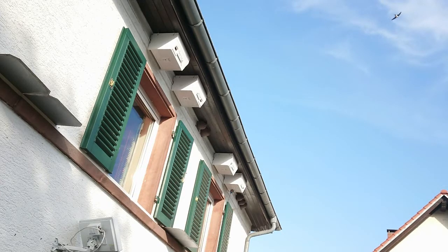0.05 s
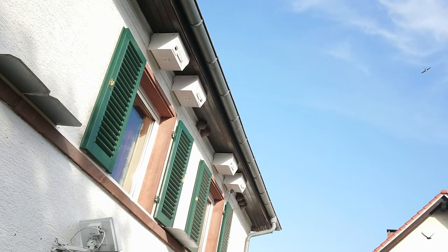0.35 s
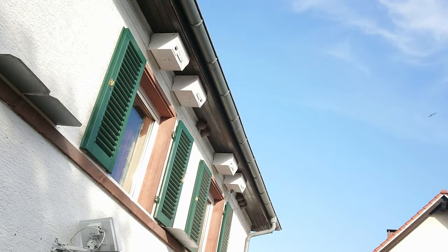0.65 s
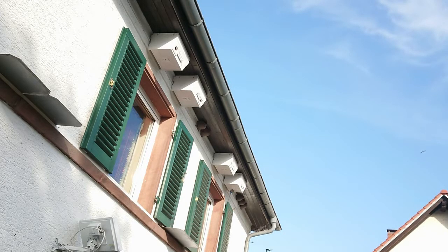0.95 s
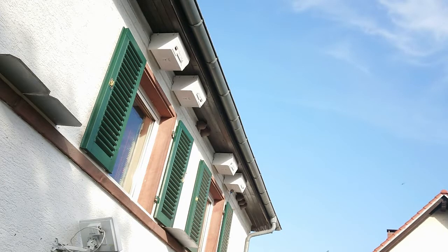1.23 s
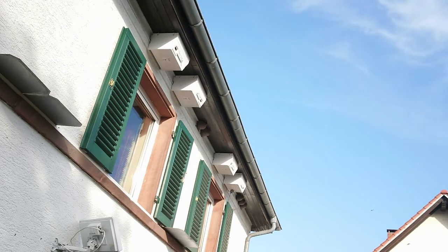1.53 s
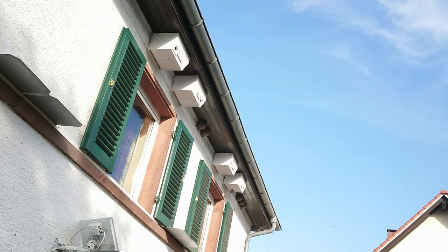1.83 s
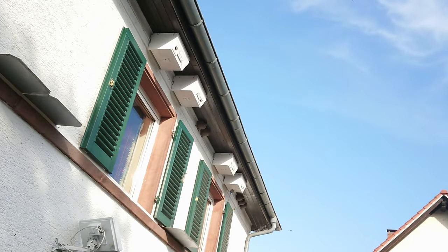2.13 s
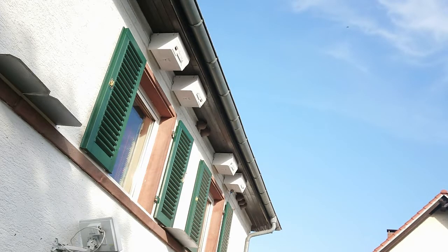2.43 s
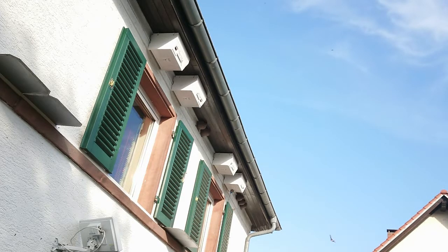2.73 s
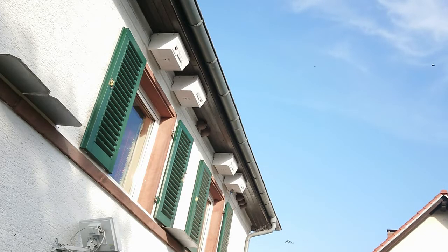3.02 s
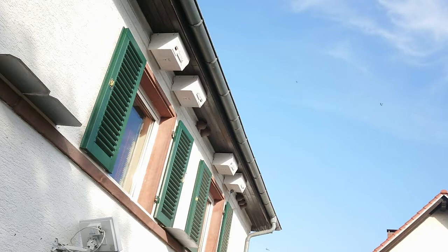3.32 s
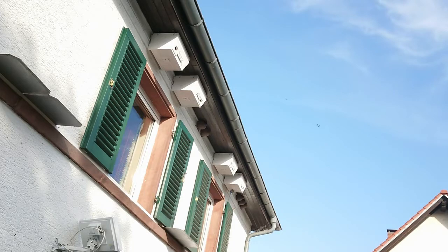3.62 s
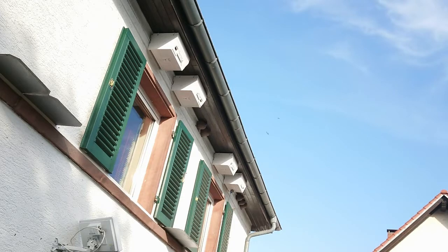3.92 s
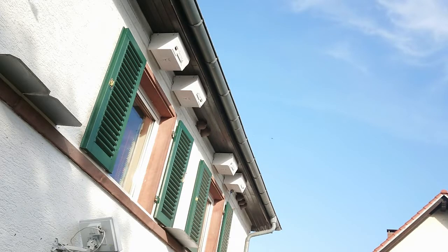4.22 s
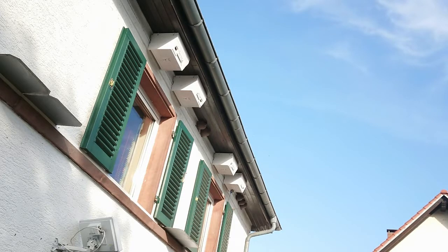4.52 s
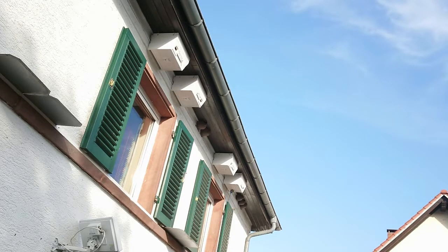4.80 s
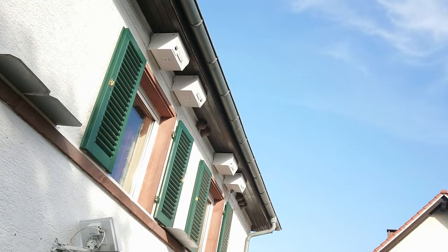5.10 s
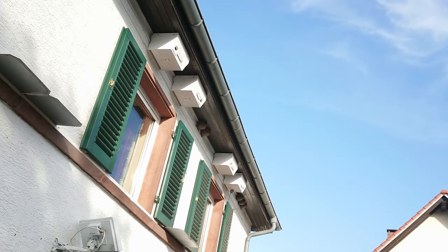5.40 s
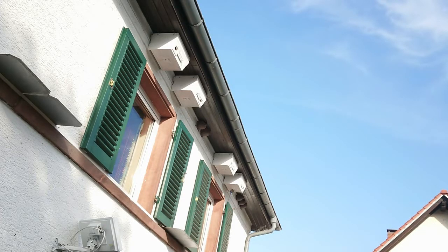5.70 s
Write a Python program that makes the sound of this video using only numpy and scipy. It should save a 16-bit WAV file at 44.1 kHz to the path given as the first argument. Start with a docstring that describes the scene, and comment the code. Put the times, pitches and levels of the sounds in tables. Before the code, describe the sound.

Small birds call around a village house over a steady soft hiss and low rumble. House martins give short, high cheeps about two or three times a second throughout, mixed with thin rasps and tiny rattles. A swift screams at 0.2 seconds and breaks into quick pips. A louder, shrill, buzzy scream comes at 1 second, trailing into pips by 1.5. Around 2 seconds there is a loud squabble of quick whistles and chirps, then a distant village wash swells softly until 3. More swift screams at 3 and 3.7 seconds each end in rapid pips. After 4 seconds the calls thin to martin cheeps and twitters, with one weak scream, until the end near 5.7. A high flock, a far songbird and, mainly from 3.5 seconds, a cooing dove are very faint. The near calls sit mostly to the right and echo briefly off the walls.

```python
"""A house martin cheeps, then swifts scream as both circle over a village house. Screams are whistles chopped
into a fast buzz that break up into pips; martins add slurs and rattles, and both birds add harsh level notes.
Walls echo the calls. Behind lie a high flock, a far dove and songbird, a low rumble, a soft hiss and a village
wash that swells once. Two unlike microphone ports colour left and right differently."""
import sys
import numpy as np
from scipy import signal
from scipy.fft import rfft, irfft, next_fast_len
from scipy.io import wavfile
from scipy.ndimage import uniform_filter1d, map_coordinates

SR = 44100
rng = np.random.default_rng(int(sys.argv[2]) if len(sys.argv) > 2 else 0)


def store_pcm(level_fs):
    """Save levels as 16-bit WAV."""
    pcm = np.round(np.clip(level_fs, -1, 1) * 32767).astype(np.int16)
    wavfile.write(sys.argv[1], SR, np.atleast_2d(pcm).T)


N = 253575
TOP_HZ = 15700

# Call levels are ahead of the colouring filters.
# swift screams: (time [s], length [s], start [Hz], middle [Hz], end [Hz], start level [dB], fade [dB],
# mid buzz depth [0-1], half harmonics at start [dB])
SCREAMS = [(0.238, .23, 4305, 4440, 4784, -40.5, 2.5, 0.98, -46),
           (1.013, .138, 4792, 4730, 4926, -23, 9, 0.23, -35),
           (1.15, 0.3, 5060, 5540, 5585, -37, 11, 0.83, -32),
           (3.046, .17, 4592, 4612, 4562, -29, 2.5, 0.45, -45),
           (3.714, .185, 4627, 5078, 4940, -24, 12.5, 0.35, -44.5),
           (4.709, 0.18, 4560, 4406, 4434, -47.5, 1.5, 0.37, -60)]
# swift whistles: (time [s], length [s], start [Hz], middle [Hz], end [Hz], level [dB])
WHISTLES = [(0.133, .11, 4650, 4150, 3980, -47.5), (0.943, .04, 4250, 4520, 5000, -37.5),
            (0.975, 0.057, 5200, 5360, 4890, -36), (1.868, 0.055, 4600, 4964, 4450, -30),
            (1.928, .03, 4100, 4754, 4930, -25), (1.953, 0.015, 3554, 3652, 3810, -25),
            (1.954, 0.044, 5200, 5680, 5850, -41.5), (1.968, 0.033, 4345, 5120, 4530, -28.5),
            (2.036, 0.019, 3300, 3336, 3580, -36.5), (2.064, 0.0343, 4248, 4543, 4430, -26.5),
            (2.969, 0.0846, 4220, 4510, 4310, -40.5), (3.675, 0.041, 3960, 4190, 4300, -46)]
# swift pips: (first [s], last [s], rate [1/s], pitch [Hz], final sag [Hz], level [dB], final gain [dB])
PIP_TRAINS = [(0.508, 0.591, 40, 5656, 690, -37.5, 4.5), (1.391, 1.536, 35, 5814, 990, -37, 5.5),
              (3.276, 3.347, 70, 4643, 158, -31.5, -1), (3.915, 3.992, 65.5, 4914, 370, -27.5, 2)]
# martin cheeps: (end time [s], level [dB])
CHEEPS = [(0.138, -35), (.46, -30.5), (.788, -30.5), (1.258, -37), (1.787, -47), (2.292, -31.5),
          (2.732, -32), (3.488, -35), (4.105, -32), (4.407, -37.5), (4.614, -34), (5.078, -31.5),
          (5.495, -33.5)]
# contour of a cheep: (time from end [s], pitch [Hz], level [dB])
CHEEP_SHAPE = [(-.07, 4540, -6.5), (-.055, 5000, -14.5), (-.036, 5040, -11), (-.024, 5000, -5),
               (-.012, 4600, 3), (0, 4520, -6.5)]
# martin loops, up and down: (time [s], length [s], level [dB])
LOOPS = [(0.387, 0.068, -51), (0.953, 0.053, -52), (2.443, 0.032, -53), (2.905, .023, -59), (3.35, .1, -51),
         (3.8, 0.088, -54.5), (4.299, .046, -54.5), (4.781, 0.049, -48.5), (4.94, 0.032, -53)]
# martin downward flicks: (time [s], middle pitch [Hz], level [dB])
FLICKS = [(1.818, 4500, -35.5), (1.995, 4650, -26.5), (2.019, 4400, -35), (2.921, 4600, -58),
          (3.298, 8650, -48.5), (3.644, 4500, -41), (3.765, 7670, -51), (5.398, 4770, -45.5),
          (5.653, 3970, -38.5), (5.653, 8260, -55.5)]
# harsh notes of near-level pitch, from martins and swifts; the thin ones near 11 kHz lie an octave above swift
# pips, and the one at 1.165 s rides on the swift scream: (time [s], length [s], pitch [Hz], level [dB],
# harshness [0-1])
RASPS = [(0.477, .12, 7370, -59.5, 0.55), (0.488, .15, 10900, -69, 0.23), (0.728, 0.017, 4750, -43, 0.5),
         (1.135, 0.15, 4840, -40.5, 0.54), (1.165, 0.21, 7190, -59, 0.33), (1.382, .15, 11600, -60, 0.47),
         (1.386, 0.097, 7720, -52.5, .85), (1.486, .05, 5850, -40.5, 0.24), (1.839, 0.053, 6080, -48, 0.57),
         (2.412, .29, 11300, -73, 1), (2.796, 0.058, 7000, -58, 0.9), (3.331, 0.34, 11000, -71.5, 0.7),
         (4.722, 0.057, 7200, -61.5, 0.4), (4.773, 0.022, 5030, -40.5, 0.32), (4.783, .1, 11460, -65, 0.67),
         (4.827, 0.0466, 9100, -49, 0.54), (4.868, 0.02, 7530, -45.5, .3),
         (4.876, 0.031, 5030, -38.5, 0.38), (5.103, 0.125, 10970, -65.5, 0.15)]
# martin rattles: (time [s], length [s], level [dB])
RATTLES = [(0.615, .015, -45), (1.412, .055, -39), (1.51, .04, -36.5), (1.8, .01, -36.5),
           (1.822, .037, -38), (1.894, .03, -33.5), (2.095, .005, -33.5), (2.802, .052, -50.5),
           (3.758, .032, -46.5), (4.115, .04, -46.5), (4.291, .06, -48)]
# far dove: (time [s], length [s], pitch [Hz], level [dB])
COOS = [(1.6, 0.287, 386, -70), (3.52, 0.21, 487.5, -69), (3.76, 0.19, 489.7, -68),
        (3.99, 0.11, 488.4, -69.5), (4.26, .208, 492.5, -73.5), (5, 0.203, 485.4, -71.5),
        (5.26, 0.35, 444.6, -66.5)]
# far songbird: (time [s], length [s], pitch [Hz], level [dB])
FAR_NOTES = [(2.6, 0.65, 2191, -67.5), (2.698, 0.27, 2820, -67.5), (3.39, 0.048, 2390, -69),
             (5.547, 0.184, 1645, -71.5)]
# syrinx harmonics 2 and 3: (level [dB])
OVERTONES_DB = [-29, -37]
# colour of the near calls: (frequency [Hz], gain [dB])
CALL_EQ_DB = [(1000, -27), (2400, -7.5), (3200, -3), (5000, 1.5), (6500, -9.5), (7400, 3.5), (8200, -2.5),
              (9400, -8), (11300, 4.5), (12800, -15), (14200, -3)]
# left port against right, direct sound: (frequency [Hz], gain [dB])
LEFT_DIRECT_DB = [(2400, 5.5), (3600, -1.5), (4200, 0), (4700, -22.5), (5150, -19), (5700, -3), (7500, 3.5),
                  (9500, 6), (11500, -0.5), (15000, -33)]
# left port against right, echoes: (frequency [Hz], gain [dB])
LEFT_ECHO_DB = [(500, -31), (2400, 1.5), (3600, 2), (4700, -21), (5700, -2), (7500, -1), (11500, 11)]
# wall echo decay: (frequency [Hz], T60 [s])
WALL_T60_S = [(500, 0.77), (4500, 0.72), (8000, 0.92), (14000, 0.068)]
# noise spectra: (frequency [Hz], relative density [dB])
RUMBLE_DB = [(13, -34), (22, -53), (43, 2), (69, 6), (97, 2), (178, -13.5), (257, -20.5), (300, -33),
             (390, -44), (660, -120)]
WASH_DB = [(120, -12), (220, -13), (400, -4.5), (600, -3.5), (800, -6), (1050, -5.5), (1350, -13.5),
           (2000, -7.5), (3500, -13), (6000, -120)]
HISS_DB = [(800, -70), (1400, -16.5), (2000, -21), (2600, -14), (3300, -4), (4100, -7), (4700, -1.5),
           (5600, -21), (6400, -12.5), (7400, -18), (9400, -27), (11100, -24), (12800, -32.5), (15500, -38)]
# background left-right likeness: (frequency [Hz], correlation [-1 to 1])
NOISE_CORRELATION = [(60, 0.93), (120, 0.53), (240, 0.8), (480, 0.51), (950, 0.15), (1890, -0.43),
                     (3770, 0.47), (7520, 0.11), (15000, 0.084)]
# background balance: (frequency [Hz], left minus right [dB])
NOISE_BALANCE_DB = [(60, -3), (200, -11), (600, -4), (1300, -4.5), (2400, -1), (3500, 8), (4600, -16),
                    (6000, -1), (8000, 0.5), (15000, -2)]


def swift_screams(buzz_start_hz=236.4, slowing_hz_per_s=102, deepening=0.22, strain_db=16, attack_s=0.01):
    """Screams fade as the buzz tires and deepens; strain raises the half harmonics."""
    out = np.zeros(N)
    for time_s, length_s, *bend_hz, db, fade_db, depth, half_db in SCREAMS:
        pitch_hz, _ = arch(length_s, *bend_hz)
        pitch_hz *= 1 + 0.005 * wobble(44.9, len(pitch_hz))
        progress = np.linspace(0, 1, len(pitch_hz))
        attack = np.minimum(1, length_s * progress / attack_s)
        buzz_hz = buzz_start_hz - slowing_hz_per_s * length_s * progress
        scream = syrinx(pitch_hz, db - fade_db * progress, buzz_hz, depth + deepening * (progress - 0.5),
                        half_db=half_db + strain_db * progress, rasp_db=-28 + 6 * depth,
                        unsteady=0.023, waver=0.00506, flutter_db=1.5)
        add(out, time_s, attack * scream)
    return out


def swift_whistles():
    """Clear, lightly buzzed whistles: lead-ins to screams, or a squabble."""
    out = np.zeros(N)
    for time_s, length_s, *bend_hz, db in WHISTLES:
        pitch_hz, swell = arch(length_s, *bend_hz)
        whistle = syrinx(pitch_hz, db, 211.5, 0.25,
                         rasp_db=-24.5, unsteady=0.035, waver=0.005, flutter_db=1.6)
        add(out, time_s, swell * whistle)
    return out


def swift_pips(start_duty=0.58, shortening=0.25, scatter_db=1.0):
    """A scream breaks into evenly spaced pips; late ones sink, shorten and fall more steeply."""
    out = np.zeros(N)
    for first_s, last_s, rate_hz, top_hz, sag_hz, db, gain_db in PIP_TRAINS:
        for progress in np.linspace(0, 1, round((last_s - first_s) * rate_hz) + 1):
            late = progress ** 3.2
            length_s = start_duty * (1 - shortening * late) / rate_hz
            hz = top_hz - sag_hz * late
            half_fall_hz = 50 + 150 * progress
            pitch_hz, swell = arch(length_s, hz + half_fall_hz, hz, hz - half_fall_hz)
            pip_db = db + gain_db * late + scatter_db * rng.standard_normal()
            pip = swell ** 2 * syrinx(pitch_hz, pip_db, 188, 0.29, rasp_db=-17.5)
            add(out, first_s + progress * (last_s - first_s) - length_s / 2, pip)
    return out


def syrinx(hz, db, buzz_hz, depth, half_db=-70, rasp_db=-24, swing_hz=200,
           unsteady=0.037, waver=0.0056, flutter_db=1.93):
    """A whistle; a slower vibration chops it and bends its pitch within each pulse."""
    n = len(hz)
    depth = np.clip(depth, 0, 1)
    buzz_phase = 2 * np.pi * np.cumsum(buzz_hz * (1 + unsteady * wobble(144.4, n))) / SR
    gate = (1 + depth * np.cos(buzz_phase)) / np.sqrt(1 + depth ** 2 / 2)
    roughness = 1 + 2 * depth
    pitch_hz = hz * (1 + waver * roughness * wobble(500, n)) - swing_hz * depth * np.sin(buzz_phase)
    phase = 2 * np.pi * np.cumsum(pitch_hz) / SR
    phase += amp(rasp_db) * roughness * wobble(2200, n)  # uneven cycles smear the partials
    tone = np.sin(phase)
    for k, overtone_db in enumerate(OVERTONES_DB, 2):
        tone += amp(overtone_db) * np.sin(k * phase) * (k * hz < TOP_HZ)
    tone += amp(half_db) * (np.sin(1.5 * phase) + 0.79 * np.sin(phase / 2))  # strain doubles the period
    edges = signal.windows.tukey(n, min(1, 0.0022 * SR / n))
    return np.sqrt(2) * tone * gate * edges * amp(db + flutter_db * wobble(169.7, n))


def martin_cheeps(upper_offset_hz=700, upper_db=-53):
    """Arched cheeps, each bent differently; the other side of the syrinx sings faintly above."""
    out = np.zeros(N)
    shape_hz, shape_db = curves(CHEEP_SHAPE)
    n = len(shape_hz)
    for end_s, db in CHEEPS:
        pitch_hz = shape_hz * (1 + 0.011 * wobble(30.3, n))
        upper = np.hanning(n) * syrinx(pitch_hz + upper_offset_hz, upper_db, 180, 0.22)
        lower = syrinx(pitch_hz, db + shape_db + 2 * wobble(61.6, n), 260.3, 0.24, rasp_db=-17)
        add(out, end_s + CHEEP_SHAPE[0][0], lower + upper)
    return equalise(out, [(6500, -4.5), (9000, -13), (14000, -16)])


def slur(length_s, bend_hz, db, harsh):
    """One glide; harshness deepens its buzz and smears its pitch."""
    pitch_hz, swell = arch(length_s, *bend_hz)
    return swell * syrinx(pitch_hz, db, 180, harsh, rasp_db=-13.5 + 11 * harsh, unsteady=0.72, waver=0.0081)


def slurs(loop_hz=(5620, 6310, 5250), flick_s=0.0151):
    """Twitter of martin loops and quick flicks, with harsh level notes from martins and swifts."""
    out = np.zeros(N)
    for time_s, length_s, db in LOOPS:
        add(out, time_s, slur(length_s, loop_hz, db, harsh=0.16))
    for time_s, hz, db in FLICKS:
        add(out, time_s, slur(flick_s, (1.11 * hz, hz, 0.89 * hz), db, harsh=0.27))
    for time_s, length_s, hz, db, harsh in RASPS:
        add(out, time_s, slur(length_s, (0.982 * hz, hz, 0.982 * hz), db, harsh))
    return out


def martin_rattles(rate_hz=190, centre_hz=3850, half_rise_hz=250, tick_s=0.0042, jitter_s=0.000974):
    """Quick, uneven runs of tiny rough chirps."""
    out = np.zeros(N)
    for time_s, length_s, db in RATTLES:
        for onset_s in np.arange(time_s, time_s + length_s, 1 / rate_hz):
            late, size, tune = rng.standard_normal(3)
            hz = centre_hz + 190 * tune
            pitch_hz, swell = arch(tick_s, hz - half_rise_hz, hz, hz + half_rise_hz)
            tick = swell * syrinx(pitch_hz, db + 2 * size, rate_hz, depth=0, rasp_db=-9)
            add(out, onset_s + jitter_s * late, tick)
    return out


def flock(count=60, level_db=-51, centre_hz=4500):
    """More birds twitter in turn, high over the roofs."""
    out = np.zeros(N)
    for slot, (late, tune, size, bend) in enumerate(rng.uniform(-1.1, 1, (count, 4))):
        hz = centre_hz * np.exp(0.24 * tune)
        length_s = 0.01415 * np.exp(0.65 * bend)
        pitch_hz, swell = arch(length_s, hz + 400 * bend, hz + 200, hz - 450)
        chirp = swell * syrinx(pitch_hz, level_db + 3 * size, 195, 0.52)
        add(out, (slot + late) / count * N / SR, chirp)
    return out


def far_birds():
    """A dove coos and a songbird whistles some gardens away."""
    out = np.zeros(N)
    for time_s, length_s, hz, db in COOS:
        pitch_hz, swell = arch(length_s, 0.98 * hz, hz, 0.91 * hz)
        coo = syrinx(pitch_hz, db, 30.5, 0.52, swing_hz=61, waver=0.02, unsteady=0.45, flutter_db=0.5)
        add(out, time_s, swell * coo)
    for time_s, length_s, hz, db in FAR_NOTES:
        pitch_hz, swell = arch(length_s, hz, hz, hz)
        note = syrinx(pitch_hz, db, 30.4, 0.33, swing_hz=60, waver=0.011, unsteady=0.28, flutter_db=2)
        add(out, time_s, swell * note)
    return out


def ports(x, lead_s):
    """Sound reaches the left port first, coloured differently; each port has its own reflections."""
    left = filtered(x, lambda hz: amp(along(LEFT_DIRECT_DB, hz)) * np.exp(2j * np.pi * hz * lead_s))
    return np.array([facade(left, level_db=-15), facade(x, level_db=-23)])


def facade(x, level_db, count=7):
    """The nearest wall, shutters and gutter add weak early copies."""
    out = x.copy()
    for delay_s, sign in zip(rng.uniform(0.002, 0.027, count), rng.choice([-1, 1], count)):
        add(out, delay_s, sign * amp(level_db) * x)
    return out


def wall_echoes(x, gap_s=0.012, build_s=0.0064):
    """Walls and eaves scatter the calls; the top treble dies first."""
    hz, time_s, noise = signal.stft(rng.standard_normal((2, SR)), SR, nperseg=256)
    decay = amp(-60 * time_s / along(WALL_T60_S, hz)[:, None])
    build = 1 - np.exp(-time_s / build_s)
    tail = signal.istft(noise * decay * build, SR, nperseg=256)[1]
    tail = np.pad(tail / np.linalg.norm(tail[0]), ((0, 0), (int(gap_s * SR), 0)))
    left, right = signal.fftconvolve(x[None], tail, axes=1)[:, :N]
    return np.array([equalise(left, LEFT_ECHO_DB), right])


def background(rumble_db=-62, hiss_db=-57, wash_db=-68.5, swell_db=10.5, drift_db=1.2):
    """Low rumble, high hiss and the far wash of the village, which swells once."""
    corners_s = 2.153 + np.cumsum([0, 0.09, 0.45, 0.35])  # onset, attack, slow rise, release
    swell = np.interp(np.arange(N) / SR, corners_s, [0, 0.86, 1, 0])
    wash_gain = amp(wash_db + swell_db * swell + drift_db * wobble(3.56, N))
    wash = wash_gain * diffuse_noise(WASH_DB, patchy_db=3)
    rumble = amp(rumble_db) * diffuse_noise(RUMBLE_DB, patchy_db=0.5)
    hiss = amp(hiss_db) * diffuse_noise(HISS_DB, patchy_db=4)
    return rumble + wash + hiss


def diffuse_noise(spectrum_db, patchy_db):
    """Stereo noise with patches of random gain; mid rms 1."""
    def mid_side_gains(hz):
        angle = np.arccos(np.clip(along(NOISE_CORRELATION, hz), -1, 1)) / 2
        return amp(along(spectrum_db, hz)) * [np.cos(angle), np.sin(angle)]

    bins = signal.stft(rng.standard_normal((2, N)), nperseg=512)[2]
    patches = rng.standard_normal(bins.shape[1:])
    patches = uniform_filter1d(uniform_filter1d(patches, 6, axis=0), 12, axis=1)
    patches /= np.sqrt(np.mean(patches ** 2))
    pair = signal.istft(bins * amp(patchy_db * patches), nperseg=512)[1][:, :N]
    mid, side = filtered(pair, mid_side_gains)
    stereo = np.array([mid + side, mid - side])
    stereo = filtered(stereo, lambda hz: amp(np.outer([0.5, -0.5], along(NOISE_BALANCE_DB, hz))))
    return stereo / np.std(stereo.mean(0))


def arch(length_s, start_hz, middle_hz, end_hz):
    """Pitch and swell of a note bent through three pitches."""
    progress = np.linspace(0, 1, max(int(length_s * SR), 64))
    parabola = np.polyfit([0, 0.5, 1], [start_hz, middle_hz, end_hz], 2)
    return np.polyval(parabola, progress), np.abs(np.sin(np.pi * progress)) ** 0.19


def amp(db):
    """Decibels to gain."""
    return 10 ** (np.asarray(db) / 20)


def along(points, hz):
    """Read (frequency [Hz], value) points on a log axis."""
    knots_hz, values = np.transpose(points)
    return np.interp(np.log(hz + 1), np.log(knots_hz + 1), values)


def curves(rows):
    """Per-sample curve of each column after time."""
    time_s, *columns = np.transpose(rows)
    return [np.interp(np.arange(time_s[0], time_s[-1], 1 / SR), time_s, column) for column in columns]


def wobble(knots_per_s, n):
    """Smooth random curve of n samples."""
    knots = rng.standard_normal(int(n * knots_per_s / SR) + 4)
    return map_coordinates(knots, [np.arange(n) * knots_per_s / SR])


def filtered(x, response):
    """Apply a frequency response."""
    size = next_fast_len(N + SR // 2)
    return irfft(rfft(x, size) * response(np.fft.rfftfreq(size, 1 / SR)), size)[..., :N]


def equalise(x, points):
    """Filter by (frequency [Hz], gain [dB]) points."""
    return filtered(x, lambda hz: amp(along(points, hz)))


def add(track, time_s, sound):
    """Mix a sound in at time_s."""
    start = int(np.clip(round(time_s * SR), 0, N))
    track[start:start + len(sound)] += sound[:N - start]


def scene():
    """Near birds with echoes, far birds mostly as echo, and the background."""
    swifts = swift_whistles() + swift_screams() + swift_pips()
    twitter = martin_cheeps() + slurs()
    calls = np.array([swifts, twitter, martin_rattles(), flock()])
    swifts, twitter, rattles, high_flock = equalise(calls, CALL_EQ_DB)
    distant = far_birds()
    direct = ports(swifts, lead_s=0.00019)
    direct += ports(twitter + high_flock + amp(-7.5) * distant, lead_s=0.00016)
    direct += ports(rattles, lead_s=0.00007)
    send = amp(-9.5) * swifts + amp(-15) * twitter + amp(-13) * rattles + amp(1.5) * high_flock + distant
    return direct + wall_echoes(send) + background()


def record(dry):
    """Brick-wall low-pass at TOP_HZ."""
    return filtered(dry, lambda hz: hz < TOP_HZ)


dry = scene()
out = record(dry)
store_pcm(out)
```